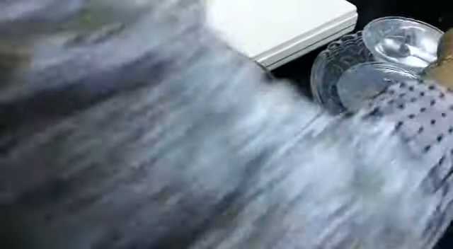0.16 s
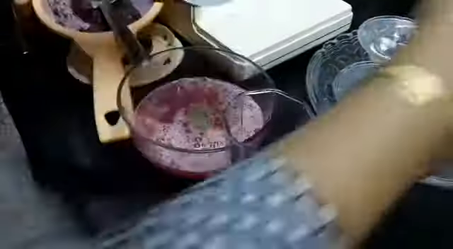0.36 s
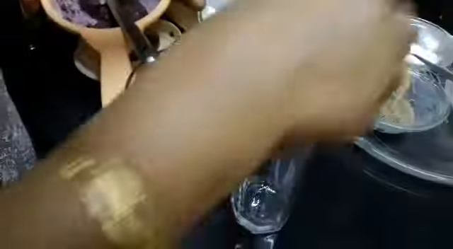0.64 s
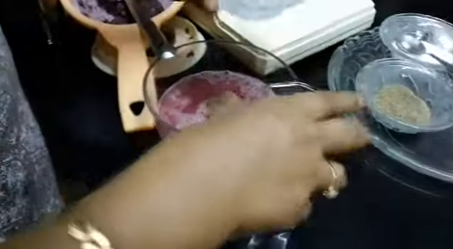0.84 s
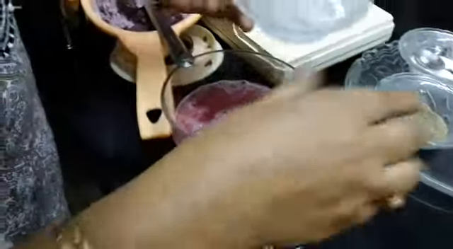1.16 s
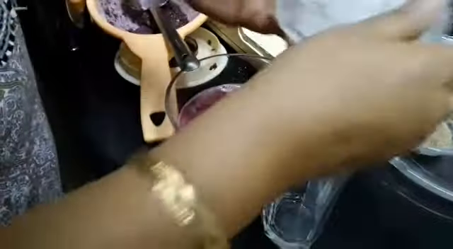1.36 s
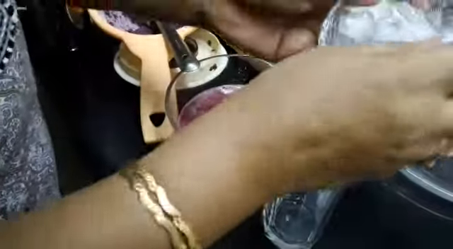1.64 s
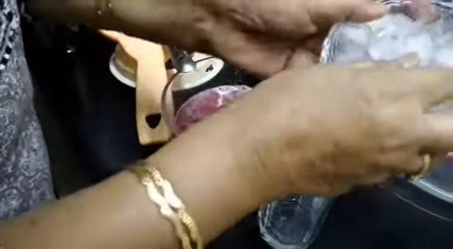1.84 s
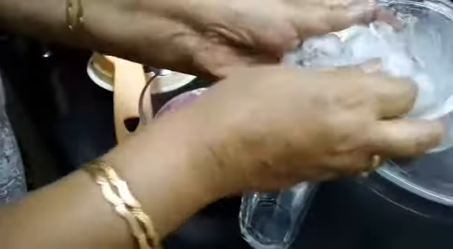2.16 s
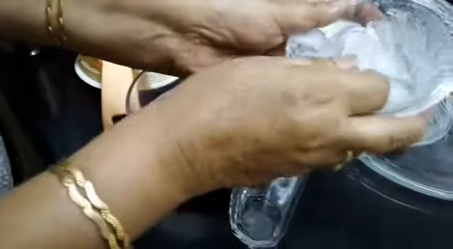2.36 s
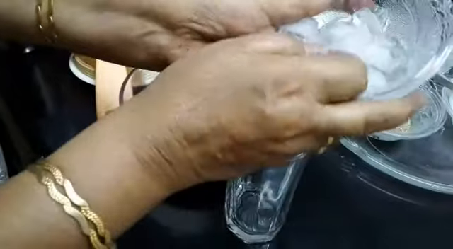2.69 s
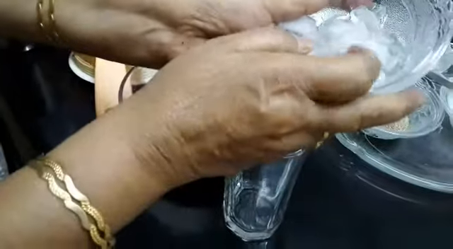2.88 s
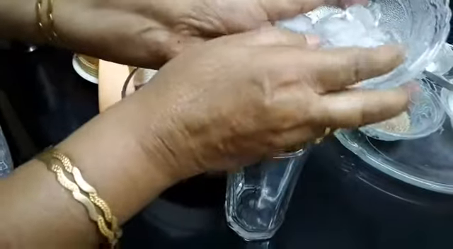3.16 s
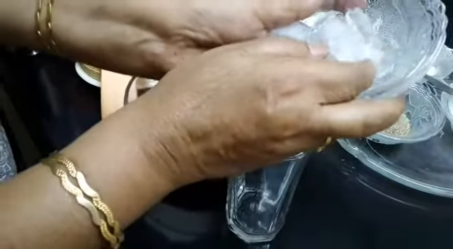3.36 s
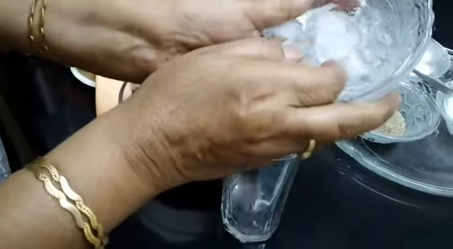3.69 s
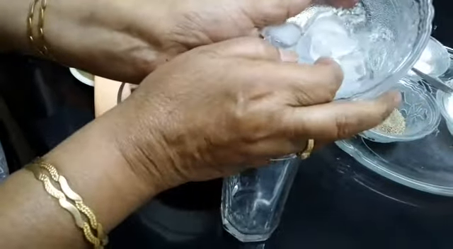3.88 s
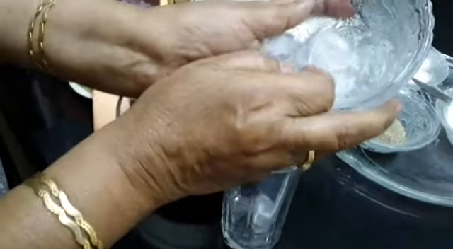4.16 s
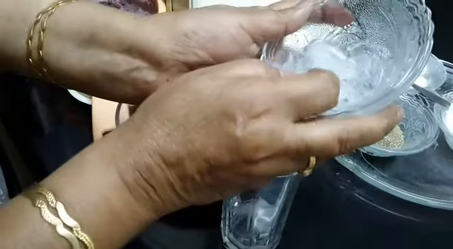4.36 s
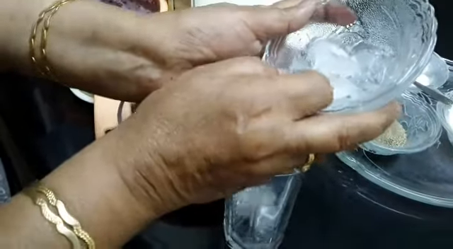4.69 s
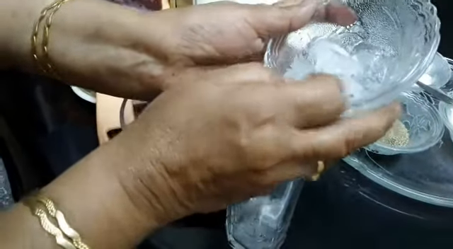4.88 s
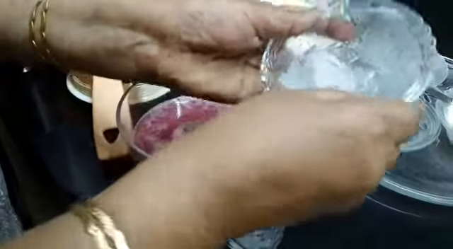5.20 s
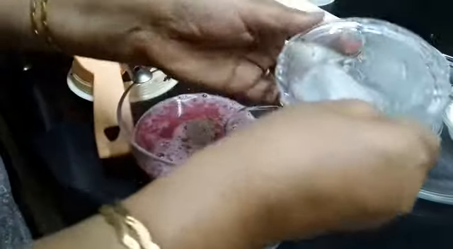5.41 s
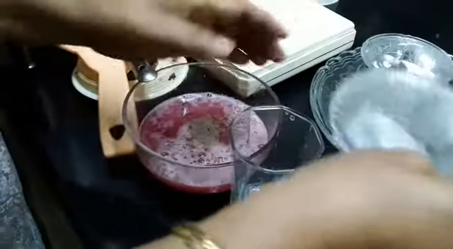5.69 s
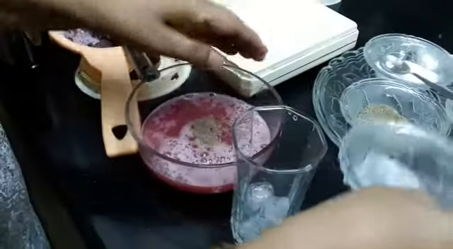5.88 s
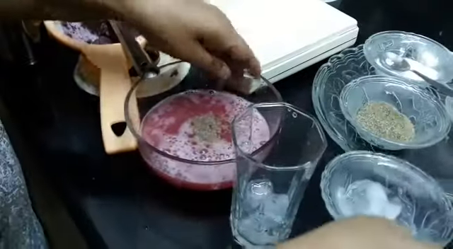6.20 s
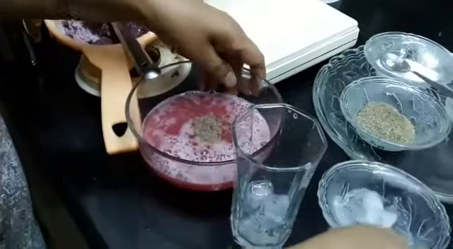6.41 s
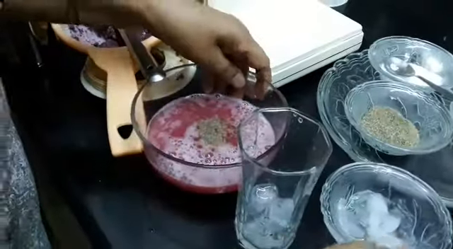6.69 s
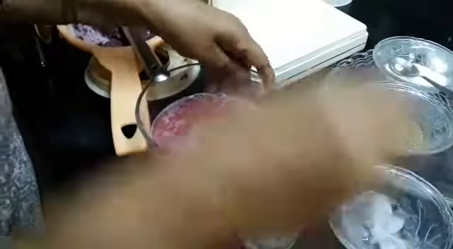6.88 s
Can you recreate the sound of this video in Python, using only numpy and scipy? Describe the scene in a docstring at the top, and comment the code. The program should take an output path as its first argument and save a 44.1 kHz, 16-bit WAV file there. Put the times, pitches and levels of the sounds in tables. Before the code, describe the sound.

Close ice cubes slip, crack and tumble into a glass, between a brief distant metal clatter and a glass bowl rocking on a hard counter.

```python
"""A metal utensil first clatters across the room, over low room noise and a thin hiss.
Close by, a tumbler is nudged on a counter, ice slips and grinds, cubes clink on its rim and drop in,
and a bowl knocks on the counter and rocks to rest; hands brush the glassware and a bangle ticks.
Each impact is a filtered click with a dying swarm of contacts, and solids ring as sums of decaying sines.
All but the background excites a hard-walled kitchen, modelled as a direct sound, a bounce and a tail."""
import sys
import numpy as np
from scipy import signal
from scipy.fft import rfft, irfft
from scipy.io import wavfile

SR = 44100
rng = np.random.default_rng(int(sys.argv[2]) if len(sys.argv) > 2 else 0)


def to_wav(sig):
    """Store sig (one row per channel, or 1-D mono) as 16-bit WAV at the path in sys.argv[1].

    Samples outside -1..1 are clipped; the rate is SR.
    """
    pcm = np.clip(np.atleast_2d(sig), -1, 1) * 32767
    pcm = np.round(pcm).astype(np.int16)
    wavfile.write(sys.argv[1], SR, pcm.T)  # frames by channels


N = 310905

# Levels in the tables are relative; the sources add their own gains.
# spectrum of an ice crack: (frequency [Hz], level [dB])
ICE_COLOUR = [(60, -35), (200, -22), (550, -15), (800, -14), (1060, -7), (1790, 2), (3160, 0), (4490, 7.5),
              (5250, 3.5), (6020, -6.5), (6800, -5), (10000, -14), (12500, -13), (16000, -29)]
# cubes falling into the tumbler: (time [s], level [dB], treble [dB], hollow note [Hz], hollow note level [dB])
DROPS = [(3.8401, -7.5, -13.5, 786, -39), (3.9396, -26.5, -27, 972, -36.5), (4.0613, -14, -2, 772, -34),
         (4.1538, -4, -2, 790, -62), (4.1827, -9, 1, 780, -42), (4.2631, -8.5, 3, 820, -29),
         (4.68, -9.5, -5, 787, -36.5), (4.8455, -15, 8, 807, -49), (4.8811, -17, 0, 786, -45)]
# a fallen cube rattles between the walls, each hit weaker than the last
DROP_GAP_S, DROP_FADE_DB, DROP_BODY_DB = .0062, 5.5, 4
# cubes slipping against a neighbour: (time [s], level [dB], body [dB], treble [dB])
SLIPS = [(1.5597, -43, -8, -8.5), (1.922, -24.5, -5, -16.5), (1.9943, -24, -11, -7.5), (2.0545, -34, 2, 7),
         (2.137, -35, -27, -10), (2.256, -26, -24, -20), (2.2707, -26.5, -21, -10),
         (2.4618, -22.5, 17.5, -11), (2.4823, -14.5, 4.5, 4), (2.5029, -21.5, 6, 3), (2.7128, -33.5, 4, -6),
         (3.022, -34.5, 10, 7.5), (3.4877, -36, -6.5, -11.5), (3.6892, -30.5, -1.5, -22),
         (3.9232, -17, 5.5, -17.5), (3.9856, -27.5, 7.5, -1), (4.4986, -28, -11, -3),
         (4.6048, -27.5, 0, -16.5), (4.7461, -18.5, 14, -3), (4.9052, -20, 4, -14), (4.9359, -23, 6, -5),
         (5.2732, -34.5, -3, -14), (6.1049, -27, 1, -8)]
# weight of a cube on the counter through the tumbler's foot: (frequency [Hz], level re drop [dB], T60 [s])
FOOT_MODES = [(38, -59.5, .22), (259, -42.5, .11), (310, -46.5, 0.11)]
# tumbler wall singing on faintly after the cube has left: (frequency [Hz], level [dB], T60 [s])
AFTERRING_MODES = [(2482, -19, .6), (4188, -30.5, .3), (6690, -25.5, 0.29), (8550, -30.5, 0.41)]
# blows on the tumbler's rim:
# (time [s], lowest mode [dB], second mode [dB], upper modes [dB], factor on ring time [1])
CLINKS = [(2.3667, -26, -21, -43.5, 0.88), (2.9397, -50, -39.5, -58, 1.0), (3.771, -27.5, -13.5, -39, 0.58),
          (4.061, -21.5, -38, -25.5, 0.5), (4.0906, -23.5, -25, -27.5, 0.41), (4.2384, -25, -34, -18, 0.78),
          (4.6473, -44.5, -49.5, -49.5, 0.86), (4.7134, -15, -22.5, -14.5, 0.5),
          (4.826, -29.5, -52, -37, 0.53), (4.859, -19, -22, -16, 0.31)]
# tumbler wall held in the fingers: (frequency [Hz], level [dB], T60 before the blow's factor [s])
TUMBLER_MODES = [(2479, 0, 0.086), (4208, -6, 0.15), (6620, 1, 0.052), (7120, -11, 0.077), (8623, -6, 0.1),
                 (10970, -11.5, 0.05), (12100, -18, 0.07), (12900, -13, 0.05), (14390, -23.5, 0.04)]
# wet cubes grinding: (start [s], end [s], level [dB], splintering treble re that level [dB])
STIRS = [(1.866, 2.027, -48.5, -15.5), (2.114, 2.173, -54.5, -28), (2.203, 2.346, -54.5, -15),
         (2.48, 2.595, -57, -6), (2.685, 2.82, -60.5, -20), (3.392, 3.745, -60.5, -47),
         (3.811, 3.883, -34.5, -16), (3.884, 4.05, -53.5, -8.5), (4.144, 4.214, -32, -7),
         (4.239, 4.285, -36, -4), (4.678, 4.7, -37.5, -13), (4.75, 4.961, -40.5, -18),
         (5.983, 6.196, -53.5, -16)]
# spectrum of the rubbing: (frequency [Hz], level [dB])
STIR_COLOUR = [(100, -50), (900, -13.5), (2200, -1), (3000, -13.5), (4300, 1), (5400, 2.5), (6200, -21),
               (9000, -35), (16000, -34.5)]
# spectrum of the splintering: (frequency [Hz], level [dB])
SPLINTER_COLOUR = [(100, -52.5), (4000, -30), (6800, 10), (7800, -9.5), (9000, -1.5), (12700, 1.5),
                   (14000, -25)]
# bowl knocking on the counter: (time [s], level [dB], treble [dB], bass [dB], ringing [dB])
KNOCKS = [(6.5318, -6.5, 1, -21, -41.5), (6.744, -16, 2, -52, -66), (6.7473, -11, 11, -26, -45),
          (6.7573, -20, 11.5, -27, -48), (6.7615, -16, 15.5, -49, -45.5)]
# spectrum of glass on the counter: (frequency [Hz], level [dB])
KNOCK_COLOUR = [(30, -41), (70, -22), (150, -18.5), (260, 19), (420, -7), (900, -6), (1300, 0.5),
                (1650, 6.5), (2250, 2), (2800, -12.5), (4000, -22), (5500, -32), (6300, -64), (16000, -79)]
# bowl and counter vibrating together: (frequency [Hz], level [dB], T60 [s])
COUNTER_MODES = [(165, -1, 0.11), (284, -6, 0.099), (640, -14, .1), (980, 5, 0.16), (1156, 0.5, 0.14),
                 (1576, 14.5, 0.1), (1777, 7, 0.13), (2191, 13, 0.13)]
# the bowl then rocks on its foot, ever faster and more softly, down to a buzz
ROCK_S, ROCK_DB, ROCK_FADE_DB = 6.5808, -7.5, 2.33
ROCK_GAP_S, ROCK_SHRINK, BUZZ_GAP_S = .0202, .61, .0043
ROCK_TREBLE_DB, ROCK_BASS_DB, ROCK_RING_DB = -1.5, -19, -37.5
# tumbler tipped against the counter: (time [s], level [dB], treble less 22 dB [dB], wall mode [dB])
NUDGES = [(0.984, -38.5, -62, -19), (1.016, -41, -54, -13), (1.076, -22.5, -30, -29),
          (1.158, -24.5, -26, -1), (1.194, -20.5, -16.5, 1)]
# empty tumbler standing free, wall mode last: (frequency [Hz], level [dB], T60 [s])
EMPTY_MODES = [(784.5, -0.5, 0.13), (1150, 4.5, 0.055), (1490, -3.5, 0.09), (1730, -9.5, 0.092),
               (2487, -10, 0.56)]
# utensil striking across the room: (time [s], level [dB], ringing [dB])
CLATTER = [(0.3085, -11.5, -28), (0.3197, -5, -23.5), (0.3774, -18.5, -21.5)]
# spectrum of its blows: (frequency [Hz], level [dB])
CLATTER_COLOUR = [(150, -38), (700, -4.5), (1050, 3.5), (1650, 11.5), (2200, 6), (2800, 4.5), (3500, -1),
                  (4600, 3.5), (5400, -27.5), (6500, -44), (9000, -41), (16000, -50)]
# ring of the utensil: (frequency [Hz], level [dB], T60 before damping [s])
METAL_MODES = [(1114, -11.5, 0.082), (1503, -5, 0.24), (1593, 4.5, 0.12), (2004, -2.5, 0.1285),
               (2540, -12.5, 0.47), (5080, 8, 0.13), (5430, -1.5, 0.062), (7130, -27, .15),
               (8400, -17.5, 0.42), (9400, -18, 0.61), (10040, -19, 0.44), (11000, -13.5, 0.23),
               (11750, -7.5, 0.28), (12950, -35, 0.13), (13900, -15.5, .2), (15030, -11, 0.22)]
CLATTER_GAP_S, CLATTER_FADE_DB = .0103, 5  # it rebounds after every blow
# hands brushing the glassware: (start [s], end [s], level [dB])
BRUSHES = [(5.53, 5.6, -60), (5.75, 5.82, -58.5)]
# spectrum of the brushing: (frequency [Hz], level [dB])
BRUSH_COLOUR = [(50, -21), (400, -3), (950, 4), (1400, -11), (3000, -48), (16000, -39)]
# ticks of a bangle: (time [s], level [dB])
TICKS = [(0.544, -57.5), (0.56, -57), (7.016, -71.5)]
# ring of the bangle: (frequency [Hz], level [dB], T60 [s])
BANGLE_MODES = [(8640, 10.5, 0.028), (12000, 18, 0.031), (13200, 15, 0.023), (14200, -9, .025)]
# reverberation of the kitchen: (frequency [Hz], T60 [s])
KITCHEN_T60 = [(100, 1), (500, 0.9), (1500, 0.56), (4000, 0.62), (7000, 0.48), (15000, 0.41)]
# stereo width of the tail: (frequency [Hz], side re middle before the wet gain [dB])
WIDTH = [(150, -37), (500, -29.5), (1500, -37.5), (5000, -26.5), (9000, -22), (14000, -20)]
# spectrum of the room noise: (frequency [Hz], relative density [dB])
AIR_COLOUR = [(15, -61.5), (25, -28.5), (53, -19), (76, -11), (180, -2), (236, -5.5), (405, -5.5),
              (624, -15), (887, -15), (1400, -17.5), (1740, -15.5), (3820, -35.5), (7710, -46.5),
              (9320, -32), (16000, -35)]
AIR_DB = -58  # rms of its middle channel
# hiss that swells and sinks: (time [s], rms level of the middle channel [dB])
HISS = [(0, -81), (1.3, -75), (1.9, -65), (2.6, -62.5), (3.3, -75.5), (3.8, -64), (4.8, -60.5), (5.4, -84),
        (7.05, -71.5)]
# spectrum of the hiss: (frequency [Hz], level [dB])
HISS_COLOUR = [(20, -59), (4000, -25.5), (7500, -17), (9000, -6.5), (12000, -5.5), (16000, -8)]
EDGE_HZ = 15950  # upper band limit


def ice(slip_db=13, drop_db=13, wall_db=-14, hollow_t60=0.071):
    """Impact excitation: slips crack once; falling cubes rattle and excite the tumbler's air, wall and foot."""
    out = np.zeros(N)
    for s, db, body_db, treble_db in SLIPS:
        add(out, s + 0.00055, amp(db + slip_db) * cube(body_db, treble_db))
    for s, db, treble_db, hollow_hz, hollow_db in DROPS:
        for at, hit_db in bounces(s, db, DROP_GAP_S, DROP_FADE_DB, count=3):
            add(out, at + .0006, amp(hit_db + drop_db) * cube(DROP_BODY_DB, treble_db))
        hollow_note = ring([(hollow_hz, hollow_db, hollow_t60)])
        foot_and_wall = ring(FOOT_MODES) + ring(AFTERRING_MODES, wall_db)
        add(out, s, hollow_note)
        add(out, s, amp(db) * foot_and_wall)
    return kitchen(out, wet_db=-4.5)


def cube(body_db, treble_db, t60=0.03, grit=17, tone=0.79):
    """Brittle contact: one crack of ice, with random modes of its own."""
    shelf = [(600, .5 * body_db), (1300, body_db), (2600, 0), (5500, 0.0018), (8500, treble_db)]
    return contact(causal(ICE_COLOUR, shelf), t60, grit, tone)


def clinks(level_db=4, crack_db=9, after_db=-3):
    """Modal excitation: a blow on the rim rings the wall modes, over the short crack of the contact."""
    out = np.zeros(N)
    for s, first_db, second_db, upper_db, damping in CLINKS:
        upper_modes_db = np.full(len(TUMBLER_MODES) - 2, upper_db)
        weights_db = np.r_[first_db, second_db, upper_modes_db]
        held_wall = ring(TUMBLER_MODES, weights_db, damping)
        afterring = ring(AFTERRING_MODES, weights_db[:len(AFTERRING_MODES)] + after_db)
        # a harder blow wakes the upper modes, cracks louder and jolts the whole glass
        force_db = max(first_db, second_db)
        hardness_db = upper_db - force_db
        shelf = [(300, hardness_db + 15.5), (1500, -2), (4000, 0.97)]
        crack = contact(causal(ICE_COLOUR, shelf), t60=.035, grit=5.2)
        add(out, s, amp(force_db + crack_db + 0.23 * hardness_db) * crack)
        # the tone yields a little to the crack in the hardest blows
        tone_db = level_db - 0.23 * max(hardness_db + 18, 0)
        add(out, s, amp(tone_db) * (held_wall + afterring))
    return kitchen(out, wet_db=-9.5)


def grinding(rub_db=-1):
    """Stick-slip friction: cubes rub in small separate slips, under bright splintering."""
    rub_gain = strokes([(start, end, db + rub_db) for start, end, db, _ in STIRS])
    splinter_gain = strokes([(start, end, db + treble_db) for start, end, db, treble_db in STIRS])
    rub = crackle(STIR_COLOUR, per_s=170, spread_db=5.5) * rub_gain
    splinters = crackle(SPLINTER_COLOUR, per_s=220, spread_db=2) * splinter_gain
    return kitchen(rub + splinters, wet_db=-7.0)


def crackle(colour, per_s, spread_db, count=8):
    """A random point process of uneven slips, shared among several cubes that each have their own ring."""
    sizes = amp(spread_db * np.minimum(rng.exponential(1, N), 3))
    slips = sizes * (rng.random(N) < per_s / SR)
    click = causal(colour, [(100, 0.0023), (16000, 0.0041)])
    owner = rng.integers(0, count, N)
    total = np.zeros(N)
    for k in range(count):
        crack = contact(click, t60=0.025, grit=6, tone=0.58)
        total += signal.oaconvolve(slips * (owner == k), crack)[:N]
    return unit(total)


def knocks(level_db=19):
    """Impact of thick glass on the counter: a knock with a low thud and a faint modal ring."""
    out = np.zeros(N)
    rocking = bounces(ROCK_S, ROCK_DB, ROCK_GAP_S, ROCK_FADE_DB, count=11,
                      shrink=ROCK_SHRINK, least_s=BUZZ_GAP_S)
    rocks = [(s, db, ROCK_TREBLE_DB, ROCK_BASS_DB, db + ROCK_RING_DB) for s, db in rocking]
    for s, db, treble_db, bass_db, ringing_db in list(KNOCKS) + rocks:
        shelf = [(45, bass_db - 17), (130, bass_db + 13), (280, bass_db + 2), (550, -1.5),
                 (1700, 2), (2300, 0.5), (3800, treble_db), (8000, 11.5)]
        knock = contact(causal(KNOCK_COLOUR, shelf), t60=.035, grit=.55)
        body = ring(COUNTER_MODES, detune=.005)
        add(out, s + 0.00064, amp(db + level_db) * knock)
        add(out, s, amp(ringing_db) * body)
    return kitchen(out, wet_db=-7.0)


def nudges(level_db=20, ring_db=-20):
    """Impact and resonance: the tumbler's thick foot taps the counter and its free modes ring."""
    out = np.zeros(N)
    for s, db, treble_db, wall_db in NUDGES:
        shelf = [(300, -20.5), (800, -4), (2000, 1.0), (3800, treble_db + 22)]
        tap = contact(causal(KNOCK_COLOUR, shelf), t60=0.033, grit=1.15)
        weights_db = np.r_[np.zeros(len(EMPTY_MODES) - 1), wall_db]
        add(out, s + 0.000886, amp(db + level_db) * tap)
        add(out, s, amp(db + ring_db) * ring(EMPTY_MODES, weights_db))
    return kitchen(out, wet_db=-6)


def utensil(blow_db=8, ring_db=-9):
    """Repeated impact at a distance: metal rattles on a vessel, with a strong reverberant share."""
    out = np.zeros(N)
    click = causal(CLATTER_COLOUR, [(2500, 0.0), (9000, -8.5)])
    for s, db, ringing_db in CLATTER:
        for at, fall_db in bounces(s, 0, CLATTER_GAP_S, CLATTER_FADE_DB, count=4):
            blow = contact(click, t60=0.11, grit=6.3, tone=0.91)
            chime = ring(METAL_MODES, damping=.4, detune=.017)
            add(out, at, amp(db + fall_db + blow_db) * blow)
            add(out, at, amp(ringing_db + fall_db + ring_db) * chime)
    return kitchen(out, wet_db=0.0)


def hands():
    """Friction noise and modal ticks: skin brushes the glassware, and a bangle ticks on the wrist."""
    out = noise(BRUSH_COLOUR) * strokes(BRUSHES)
    for s, db in TICKS:
        add(out, s, amp(db) * ring(BANGLE_MODES))
    return kitchen(out, wet_db=-9.5)


def contact(click, t60, grit, tone=0, count=22, size=4096):
    """Rough contact: a click, then a dying swarm of tiny contacts and random modes of an irregular lump."""
    t = np.arange(size) / SR
    modes = np.sin(2 * np.pi * rng.uniform(700, 13000, (count, 1)) * t).sum(0)
    swarm = (rng.standard_normal(size) + tone * unit(modes)) * amp(-60 * t / t60)
    swarm *= grit / np.linalg.norm(swarm)
    swarm[0] += 1
    blow = signal.fftconvolve(swarm, click)
    # keep the energy of the bare click
    return blow * np.linalg.norm(click) / np.linalg.norm(blow)


def causal(colour, shelf, size=2048):
    """Minimum phase: the sharpest click that has this spectrum, tilted by a shelf."""
    hz = abs(np.fft.fftfreq(size, 1 / SR))
    log_gain = np.log(amp(read(colour, hz) + read(shelf, hz)))
    # the Hilbert transform of the log gain supplies the phase
    spectrum = np.exp(np.conj(signal.hilbert(log_gain)))
    return np.fft.ifft(spectrum).real[:size // 2]


def ring(modes, weights_db=0, damping=1, detune=0.003, attack_s=0.00026, size=26000):
    """Modal superposition: softly starting, dying sines, each with a random sign and a slight pitch shift."""
    hz, db, t60 = np.transpose(modes)
    t = np.arange(size)[:, None] / SR
    # the contact pulls each pitch a little; where the blow lands sets each sign
    hz = hz * (1 + detune * rng.uniform(-0.89, 1, len(hz)))
    sign = rng.choice([-1, 1], len(hz))
    attack = 1 - np.exp(-t / attack_s)
    decay = amp(db + weights_db - 60 * t / (t60 * damping))
    return (sign * attack * decay * np.sin(2 * np.pi * hz * t)).sum(1)


def bounces(s, db, gap_s, fade_db, count, shrink=1, least_s=0):
    """Energy loss at each rebound: (s, dB) rows grow weaker, and gaps may shrink towards a least one."""
    k = np.arange(count)
    gaps = least_s + (gap_s - least_s) * shrink ** k
    times = s + np.cumsum(gaps) - gaps
    return zip(times, db - fade_db * k)


def strokes(rows):
    """Amplitude modulation: a gain that rises and falls smoothly over each (start, end, dB) row."""
    gain = np.zeros(N)
    for start, end, db in rows:
        length = max(round((end - start) * SR), 2)
        add(gain, start, amp(db) * signal.windows.tukey(length, .5))
    return gain


def noise(colour):
    """Spectral shaping: steady Gaussian noise with a given spectrum and an rms of one."""
    gain = amp(read(colour, np.fft.rfftfreq(N, 1 / SR)))
    return unit(irfft(rfft(rng.standard_normal(N)) * gain, N))


def amp(db):
    """The decibel law: level to amplitude gain."""
    return 10 ** (np.asarray(db) / 20)


def unit(x):
    """Power normalisation to an rms of one."""
    return x / np.sqrt(np.mean(x ** 2) + 1e-20)


def read(points, hz):
    """Interpolation of (Hz, value) points on a logarithmic frequency axis."""
    f, value = np.transpose(points)
    return np.interp(np.log(hz + 1), np.log(f + 1), value)


def add(mix, s, sound):
    """Superposition: adds a sound to the mix in place at time s."""
    part = mix[max(round(s * SR), 0):][:len(sound)]
    part += sound[:len(part)]


def kitchen(x, wet_db, gap_s=.002, build_s=0.0061, size=40000):
    """Room response by convolution: direct sound, a counter-top bounce, and a tail widest in the treble."""
    t = np.arange(size) / SR
    # random reflections, 5000 a second, building up after a gap
    signs = rng.choice([-1, 1], (2, size))
    hits = rng.random((2, size)) < 5000 / SR
    taps = signs * hits * np.clip((t - gap_s) / build_s, 0, 1)
    # each frequency band decays at its own rate
    hz, at, bands = signal.stft(taps, SR, nperseg=256)
    bands = bands * amp(-60 * at / read(KITCHEN_T60, hz)[:, None])
    bands[1] *= amp(read(WIDTH, hz))[:, None]
    tails = signal.istft(bands, SR, nperseg=256)[1]
    tails /= np.linalg.norm(tails[0])
    tails[0] *= amp(wet_db)
    tails[0, 0] += 1  # direct sound
    tails[0, round(.0045 * SR)] += .15  # counter-top bounce
    mid, side = signal.fftconvolve(x[None], tails, axes=1)[:, :N]
    return np.array([mid + side, mid - side])


def background(air_width=0.19, hiss_width=.4):
    """Partly correlated noise: low room noise, almost mono, under a thin hiss that is a little wider."""
    hiss_gain = amp(np.interp(np.arange(N) / SR, *np.transpose(HISS)))
    mid = amp(AIR_DB) * noise(AIR_COLOUR) + hiss_gain * noise(HISS_COLOUR)
    side_air = air_width * amp(AIR_DB) * noise(AIR_COLOUR)
    side_hiss = hiss_width * hiss_gain * noise(HISS_COLOUR)
    side = side_air + side_hiss
    return np.array([mid + side, mid - side])


def scene():
    """Linear superposition of all the sources."""
    return ice() + clinks() + grinding() + knocks() + nudges() + utensil() + hands() + background()


def record(dry):
    """Band limitation: a linear-phase low-pass removes what lies above the edge."""
    low_pass = signal.firwin(511, EDGE_HZ, window=("kaiser", 9), fs=SR)
    return signal.oaconvolve(dry, low_pass[None], "same")


dry = scene()
out = record(dry)
to_wav(out)
```